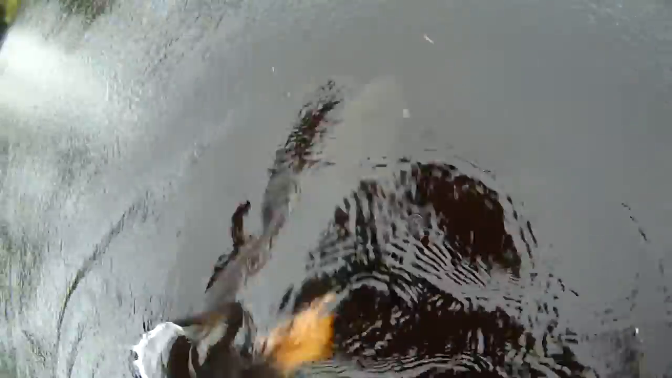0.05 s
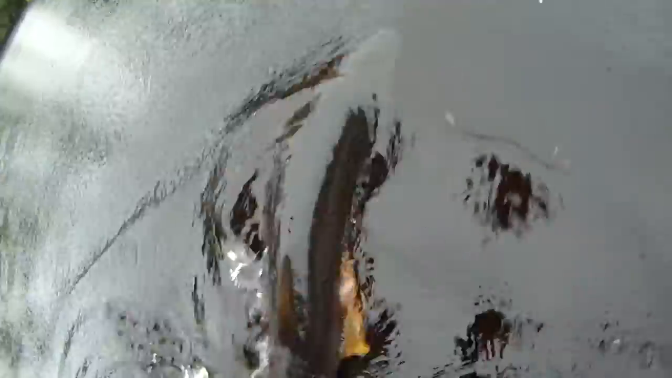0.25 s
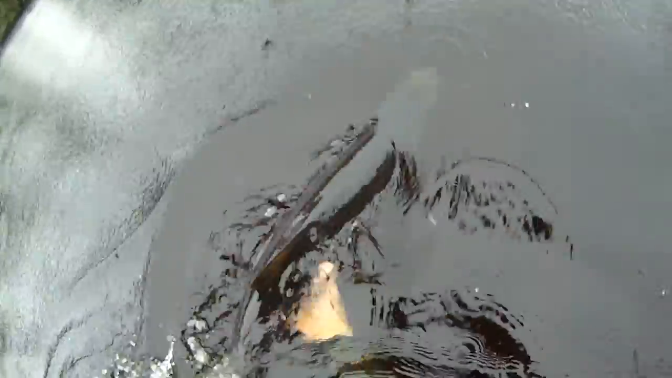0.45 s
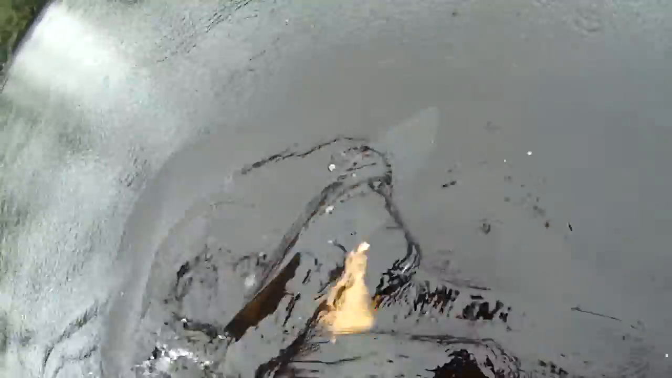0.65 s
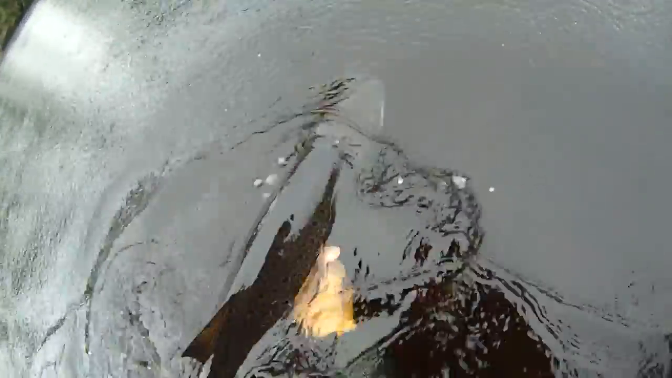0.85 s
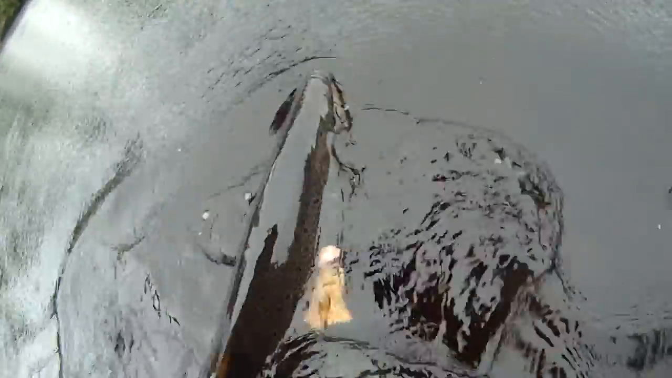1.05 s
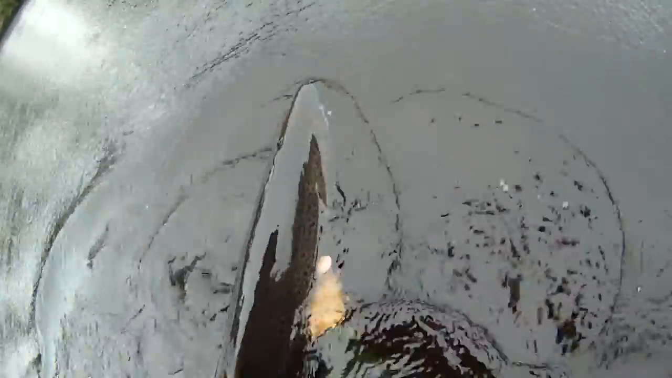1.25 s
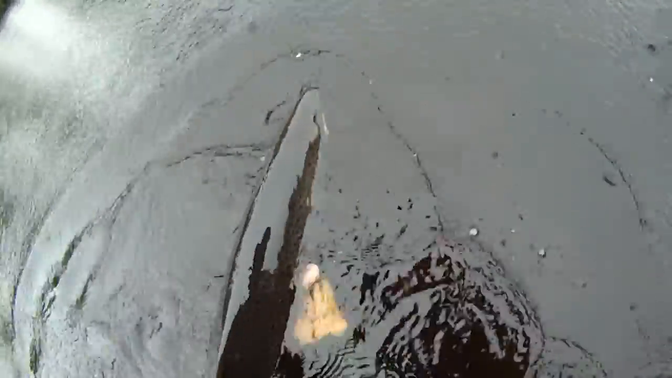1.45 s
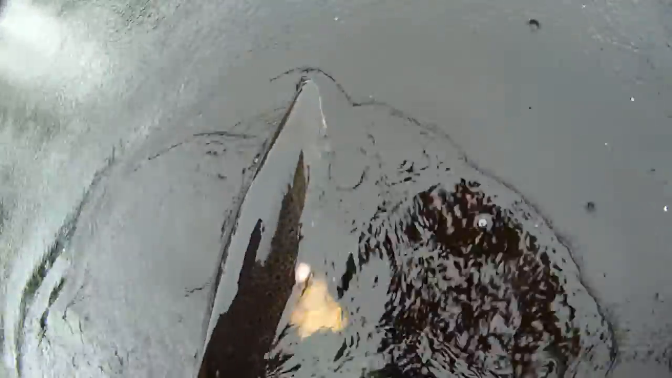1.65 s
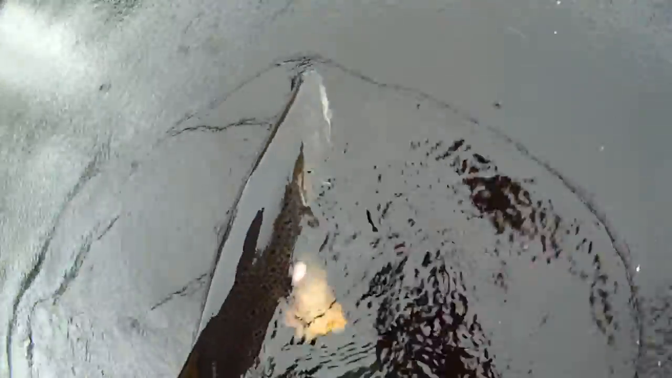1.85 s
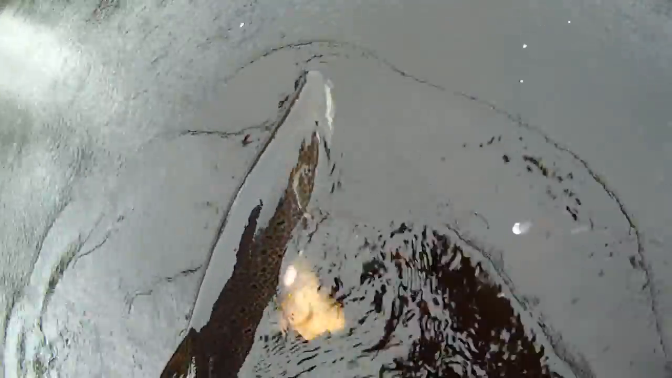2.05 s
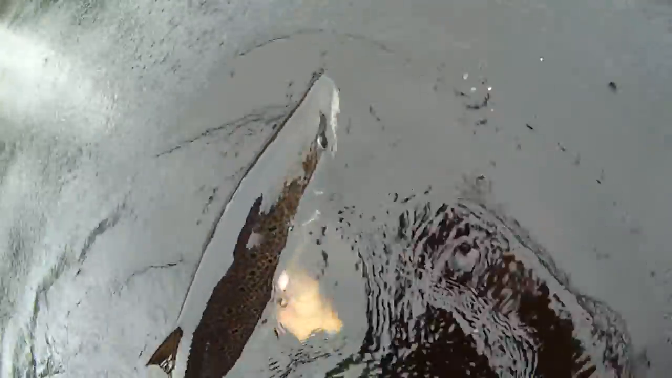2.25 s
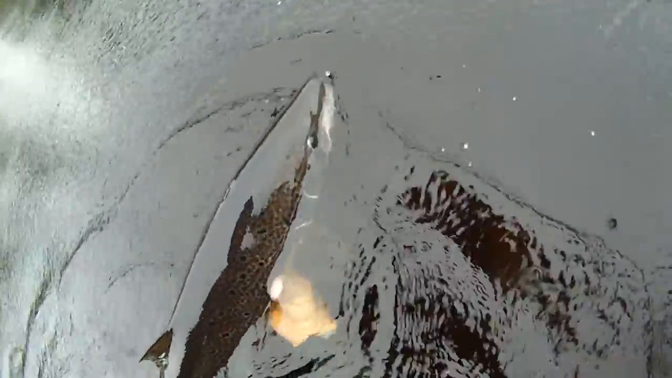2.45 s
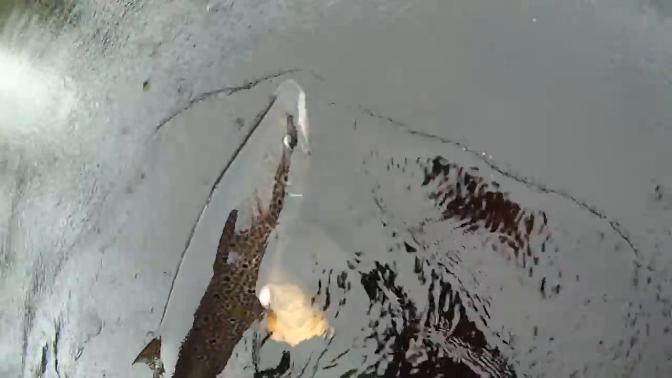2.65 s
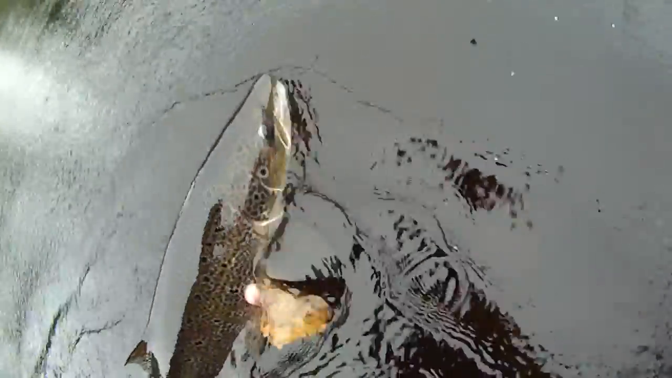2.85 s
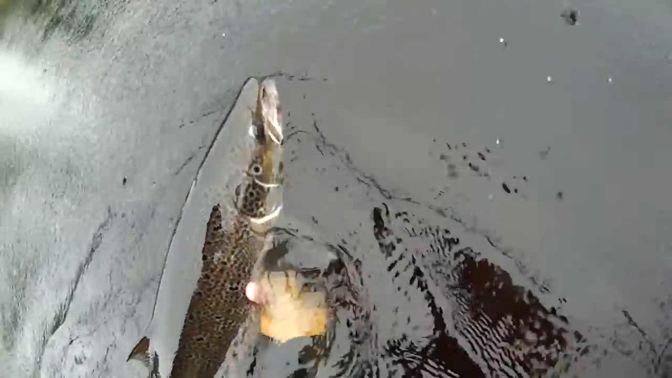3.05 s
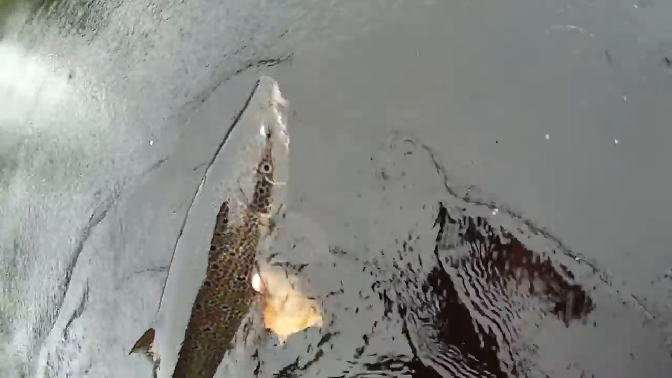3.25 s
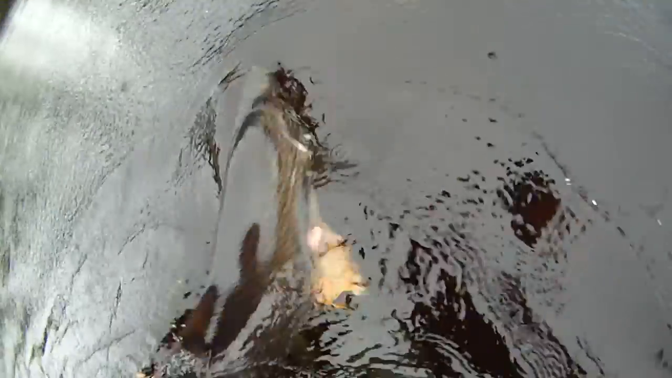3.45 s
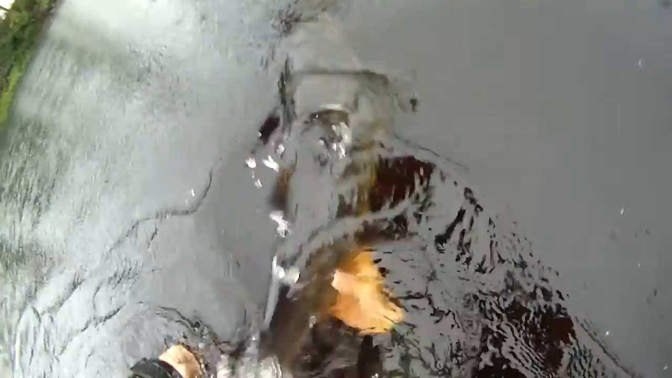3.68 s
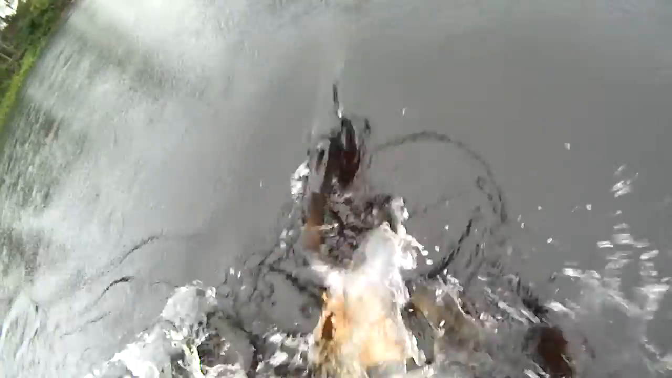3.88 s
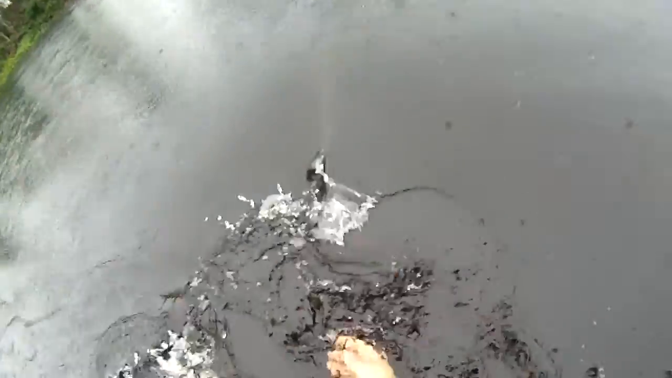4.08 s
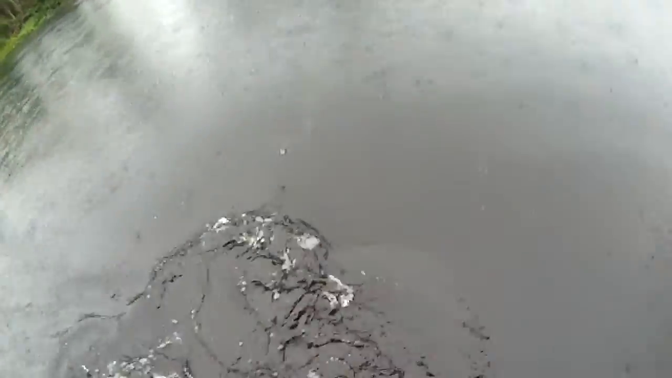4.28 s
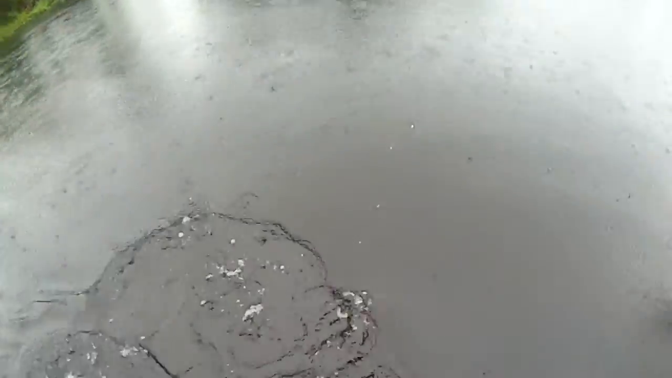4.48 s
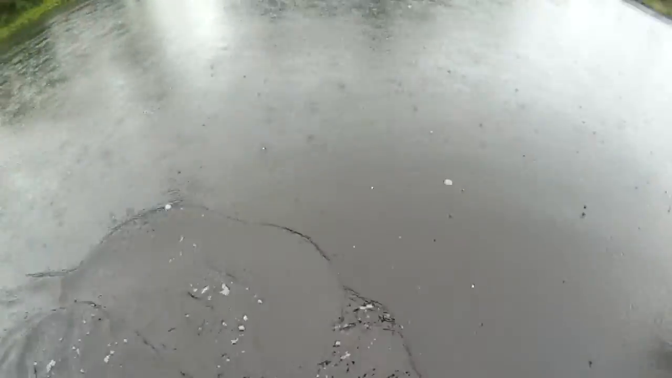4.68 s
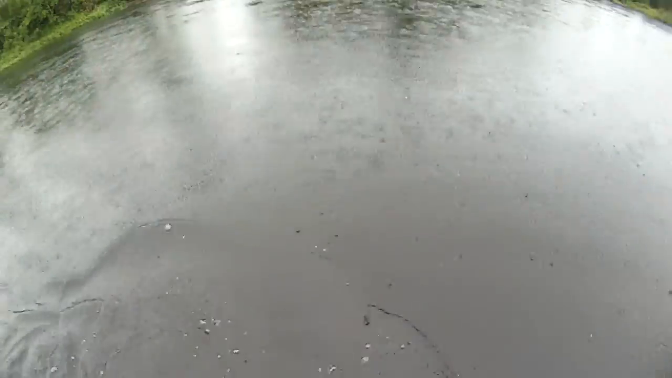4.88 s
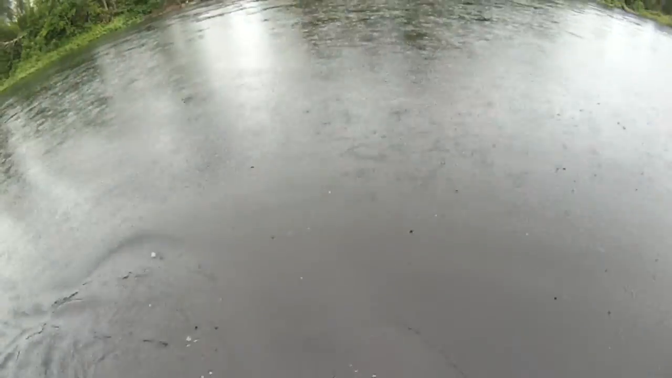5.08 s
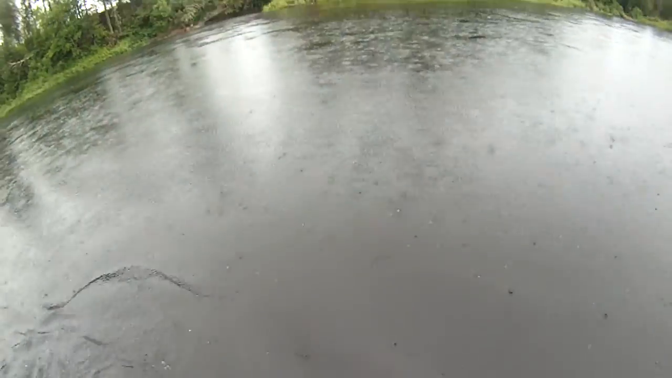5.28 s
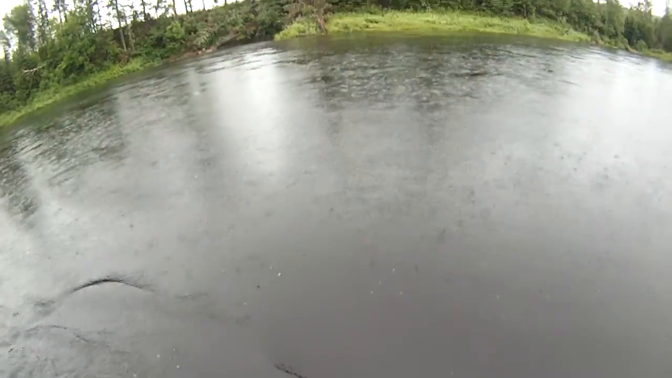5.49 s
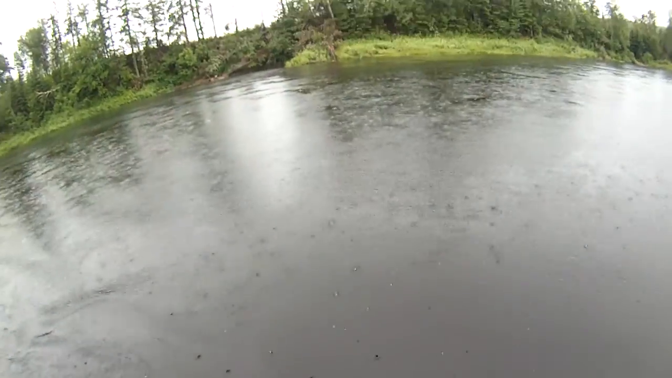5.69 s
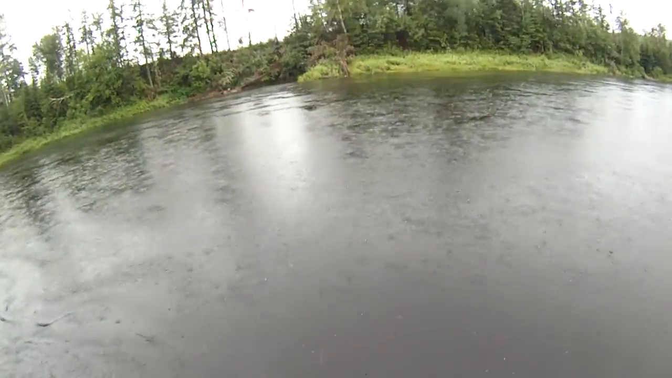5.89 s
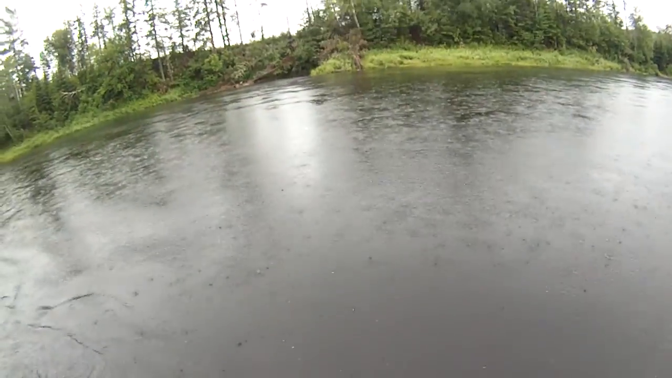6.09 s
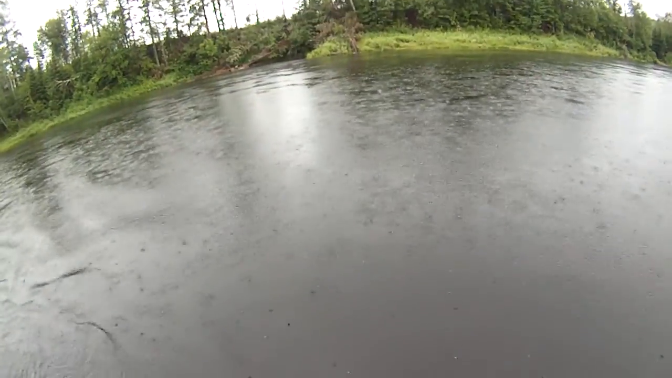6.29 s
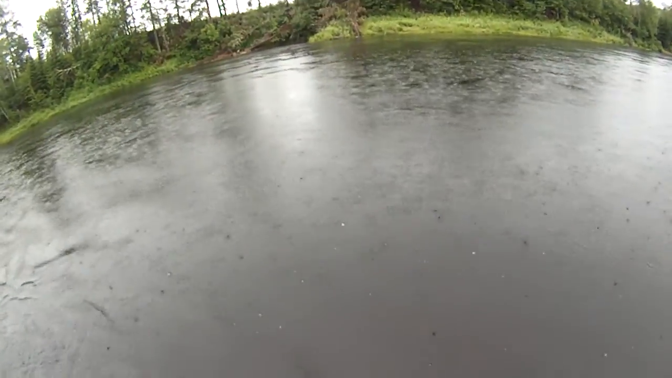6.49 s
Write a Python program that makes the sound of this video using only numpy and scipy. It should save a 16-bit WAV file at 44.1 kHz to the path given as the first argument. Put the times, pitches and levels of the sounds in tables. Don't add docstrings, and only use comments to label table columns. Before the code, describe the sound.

A boxed-in, dull recording perspective at the surface of a river in light rain. A heavy bubbly splash opens, dying within about a second. A quiet pause follows with soft patter and ticks on the shell. Then a sudden second splash hits with sharp slaps and crackling spray, followed by soft wading surges, low glugs, thin foam fizz and raindrops knocking the housing.

```python
import sys
import numpy as np
from scipy import signal
from scipy.fft import rfft, irfft, next_fast_len
from scipy.io import wavfile
from scipy.ndimage import uniform_filter1d, map_coordinates

SR = 44100
rng = np.random.default_rng(int(sys.argv[2]) if len(sys.argv) > 2 else 0)


def ratio_of_db(decibels):
    return 10 ** (np.asarray(decibels, float) / 20)


def to_wav(s):
    ch = np.atleast_2d(s).T
    pcm = np.round(np.clip(ch, -1, 1) * 32767)
    wavfile.write(sys.argv[1], SR, pcm.astype(np.int16))


N = 287973

# [f/Hz, level per Hz/dB]
HISS_COLOUR = [(24, -42), (40, -4), (194, -10), (256, -2), (503, -2), (715, 3), (1040, -16.5), (1240, -5),
               (1680, -11), (14500, -21.5), (16000, -16.5)]
# [f/Hz, level per Hz/dB]
SLOSH_COLOUR = [(71, -49), (120, -25), (156, -37), (209, -4.5), (460, -1), (610, 1.5), (1110, 0),
                (1420, -19.5), (1600, -40), (2080, -64), (3520, -120)]
# [f/Hz, level per Hz/dB]
PUSH_COLOUR = [(15, 5.5), (40, -4.0), (125, 0.5), (220, 0.5), (400, -12.0)]
# [f/Hz, level per Hz/dB]
FIZZ_COLOUR = [(1300, -0.5), (1700, 3.5), (2100, 0), (2350, -8), (2800, -1), (3500, -2.5), (4700, 0.5),
               (6600, -6), (11000, -8), (15000, -8.5)]
# [t/s, first notch f/Hz, strength of the image/0-1]
MIRROR = [
    (0, 4500, .36),
    (3.55, 4600, .26),
    (3.8, 4400, .26),
    (4.2, 4100, .34),
    (4.7, 4200, .55),
    (5.1, 4650, .62),
    (5.4, 5100, .65),
    (5.6, 5400, .6),
    (6.53, 4800, .35),
]
# [t/s, share of them left/0-1, smooth rush against bubbles/0-1]
LARGE_BUBBLES = [(0, 0, 0.5), (.1, 0.3, 0.17), (.45, 1, 0.34), (.49, 0.02, 0.28), (1.1, 0, 0.3),
                 (1.3, 0.17, 0.3), (3.6, 1, 0.22), (3.8, 1, 0.53), (4.08, 0.4, 0.32), (4.14, 0.42, 0.75),
                 (4.5, 0.5, 0.8), (6.53, 0.5, 0.52)]
# [crest t/s, slosh level/dB, hold/s, release/dB per s, foam against slosh level/dB]
SURGES = [(0.034, -49.5, .03, 60, -12), (0.138, -25, 0.04, 100, -20), (0.267, -32, 0.21, 63, -15.5),
          (0.453, -30, 0.2, 98, -13), (0.5, -37.5, 0.029, 90, -7.5), (0.831, -45, 0.025, 102, -11),
          (1.152, -49, 0.28, 43, -17), (1.626, -60.5, 0.092, 17, -12), (2.584, -64.5, 0.083, -1, -22),
          (3.097, -60.5, 0.089, 18, -25), (3.484, -55.5, .01, 60, -13), (3.56, -59, .03, 60, 1),
          (3.583, -42.5, 0.087, 37, -4), (3.679, -29, 0.45, 110, -11.5), (3.84, -40, 0.068, 41, -6.5),
          (4.07, -45.5, 0.1, 220, -5), (4.387, -49.5, 0.16, 40, -15), (4.588, -47.5, 0.16, 30, -12),
          (4.824, -49.5, 0.2, 25, -13.5), (5.074, -49.5, 0.17, 32, -12), (5.287, -53, 0.11, 24, -9.5),
          (5.434, -50, 0.12, 41, -12.5), (5.522, -51.5, 0.054, 63, -22), (5.644, -49.5, 0.23, 35, -20),
          (5.932, -55.5, 0.12, 37, -34), (6.17, -52.5, 0.044, 70, -16), (6.316, -64, 0.042, 62, 0),
          (6.497, -53.5, .04, 60, -20)]
# [t/s, low push level/dB]
SHOVES = [(.12, -51), (.3, -47), (.44, -46.5), (1.5, -59), (3.2, -59.5), (3.69, -46.5), (4.04, -59),
          (4.47, -52.5), (4.7, -50), (4.86, -44.5), (5.04, -49.5), (5.3, -48), (5.62, -50), (5.89, -53),
          (6.2, -55.5), (6.53, -52), (.75, -58), (5.2, -54)]
# [t/s, peak level/dB, f/Hz]
LUMPS = [(1.599, -48, 124), (1.637, -47, 128), (2.469, -43, 127), (1.465, -51, 128), (3.461, -41.5, 316),
         (3.468, -39.5, 132), (4.748, -43, 140), (4.952, -33, 162), (5.455, -43, 231), (4.415, -39, 131),
         (4.663, -38.5, 124), (4.824, -44, 216), (4.871, -34.5, 237), (4.997, -33, 270),
         (5.227, -33.5, 266), (5.576, -32.5, 246), (5.637, -28.5, 185), (5.804, -39, 192),
         (5.492, -38, 226), (5.842, -41, 96.9), (5.99, -35.5, 155), (6.037, -44.5, 158),
         (6.286, -34.5, 166)]
# [t/s, peak level/dB, ring f/Hz, tick level/dB]
SLAPS = [(0.124, -16.5, 980, -19), (.1295, -12, 680, -34), (.503, -17.5, 950, -40), (3.597, -23, 670, -28),
         (3.698, -14, 560, -24), (3.942, -19, 790, -30), (0.492, -17, 835, -34), (0.578, -24.5, 910, -28),
         (0.937, -31, 720, -54), (3.6335, -3, 680, -21.5), (3.7188, -8.5, 516, -32),
         (3.751, -13.5, 825, -25), (3.7598, -10.5, 650, -32), (3.83, -19, 700, -17),
         (3.947, -15.5, 830, -34), (4.284, -26, 730, -39)]
# [t/s, peak level/dB, ring f/Hz, tick level/dB]
RAINDROPS = [(1.185, -23.5, 980, -46), (1.216, -28, 960, -44), (1.23, -34.5, 620, -12),
             (1.371, -25, 910, -33), (1.821, -36, 790, -37), (2.339, -40.5, 810, -4.5),
             (2.37, -46, 690, -1.5), (2.465, -29.5, 760, -15), (2.6, -26.5, 1000, -17),
             (2.702, -37, 1010, -31), (3.002, -26.5, 990, -18), (3.049, -33, 750, -2),
             (3.119, -37, 635, -8), (3.185, -28.5, 1100, -18), (4.561, -29.5, 1150, -28),
             (4.664, -24.5, 970, -36), (4.698, -28.5, 1040, -32), (4.781, -25.5, 890, -26),
             (4.825, -24.5, 800, -11.5), (4.946, -18.5, 930, -22.5), (5.1924, -18.5, 636, -10),
             (5.2209, -24, 1010, -19), (5.318, -18, 870, -25), (5.495, -21.5, 855, -31),
             (5.745, -26.5, 1020, -23), (5.9435, -5.5, 893, -26), (6.16, -18.5, 914, -31),
             (6.286, -35, 1030, -24), (6.494, -36, 776, -14), (6.523, -20.5, 675, -12)]
# [t/s, peak level/dB, ring f/Hz]
DRIZZLE = [(1.311, -39, 503), (1.403, -37, 597), (1.575, -41, 700), (1.733, -46, 750), (1.878, -41, 950),
           (1.911, -41, 1140), (2.026, -40, 1010), (2.045, -41, 730), (2.095, -44, 740), (2.173, -43, 848),
           (2.189, -42, 1020), (2.565, -38.5, 750), (2.681, -42, 966), (3.074, -41, 775), (3.223, -39, 708),
           (5.364, -34, 496), (5.387, -34, 800)]
# [t/s, peak level/dB, f/Hz]
PLOPS = [(0.103, -16, 864), (.147, -18, 513), (0.161, -23.5, 205), (.167, -15.5, 650), (0.178, -20.5, 1073),
         (0.2039, -14, 910), (.083, -31, 840), (.11, -23.5, 490), (.218, -23, 516), (.265, -24.5, 404),
         (.305, -28, 460), (0.364, -23, 310), (0.491, -23, 506), (.512, -25.5, 480), (0.533, -31, 1300),
         (.58, -23.5, 1240), (.614, -30, 958), (.65, -29, 920), (.73, -33.5, 458), (.774, -30.5, 820),
         (3.581, -24.5, 1070), (3.676, -17, 500), (3.853, -23.5, 606), (3.86, -22, 402),
         (3.995, -26.5, 503), (4.028, -27.5, 388), (4.08, -35, 302), (4.154, -30, 930), (4.352, -39, 744),
         (4.431, -39, 760), (4.542, -38, 460), (4.591, -38, 950), (4.612, -39, 940), (4.705, -29.5, 1000),
         (5.069, -39, 840), (5.426, -39, 770), (6.172, -37.5, 1040), (6.17, -38, 448), (.349, -20.5, 425),
         (0.359, -20.5, 870), (.455, -17.5, 577), (0.586, -22, 371), (0.825, -26, 1045), (.838, -23.5, 840),
         (3.552, -27.5, 865), (3.577, -23.5, 386), (3.614, -24, 1570), (3.629, -13.5, 905),
         (3.657, -20, 980), (3.665, -18.5, 394), (3.739, -22, 1120), (3.9, -21, 440), (4.041, -24.5, 820),
         (4.575, -36, 430), (4.51, -40, 387), (4.574, -32, 1090), (6.198, -37.5, 830)]
# [t/s, peak level/dB, f/Hz, time to fall 60 dB/s, rise as a share of f/per s]
SINGERS = [(.011, -33, 586, 0.13, 24.5), (0.1265, -15.5, 1082, 0.04, 6), (.226, -24.5, 503, 0.053, -7.5),
           (.448, -16, 1035, 0.043, 12), (.636, -18.5, 395.5, 0.17, 18), (.729, -31, 747, 0.13, 2.5),
           (.731, -29.5, 940, 0.072, 8.5), (.948, -37.5, 647, 0.077, 10), (1.016, -37, 940, 0.058, 3),
           (1.087, -32.5, 1044, 0.036, -3), (3.512, -28, 994, 0.053, -2), (3.958, -23, 846, 0.065, 10),
           (4.25, -26.5, 994, 0.041, 3.5), (4.857, -32.5, 1123, 0.043, 4.5), (5.099, -47, 2640, 0.019, 19),
           (5.118, -33.5, 640, 0.076, -1), (5.157, -43, 3100, 0.01, 5), (5.172, -39, 880, 0.09, -4),
           (5.647, -44.5, 2850, 0.02, 22), (5.305, -36.5, 842, .084, 1.5), (5.359, -24.5, 1000, 0.044, 9.5),
           (5.456, -37.5, 2830, 0.011, -2), (5.705, -38, 722, 0.18, 1), (6.33, -44.5, 636, 0.088, -1),
           (6.31, -48, 326, .07, 23), (1.815, -47, 690, 0.078, 2), (3.634, -13.5, 589, 0.051, 0)]
# [t/s, peak level/dB, f/Hz]
TICKS = [(0.094, -25, 5930), (0.1245, -27.5, 6080), (0.2028, -24, 4930), (0.2404, -36, 6350),
         (0.2533, -32, 8050), (0.277, -31, 6130), (0.3183, -27.5, 6200), (0.392, -42, 6300),
         (0.4187, -25, 5900), (0.4578, -26, 6490), (0.4965, -23.5, 6540), (0.6223, -32, 7120),
         (0.678, -30, 5840), (0.688, -24.5, 6140), (0.9136, -36.5, 6200), (0.95, -39.5, 6690),
         (3.203, -46, 6000), (3.542, -25, 5370), (3.6086, -29, 6560), (3.6297, -22.5, 6080),
         (3.6598, -23, 6150), (3.92, -28, 6730), (3.9873, -33, 6550), (4.0272, -38, 6660),
         (4.1106, -36, 5600), (4.1444, -44, 6660), (4.427, -43, 5330), (4.487, -48, 6620),
         (4.6028, -34, 5100), (4.6197, -32, 6480), (4.6478, -41, 5100), (4.6828, -49, 5940),
         (4.751, -49, 5970), (4.8833, -36.5, 4570), (4.9252, -50, 5750), (4.939, -42, 6350),
         (5.038, -45, 6060), (5.097, -50, 7730), (5.1093, -41, 6590), (5.2685, -36.5, 6100),
         (5.3607, -35, 5450), (5.39, -34, 5800), (5.433, -34.5, 4900), (5.454, -41, 7100),
         (5.546, -35.5, 5800), (5.6477, -39, 5350), (5.3101, -44, 6860), (5.1505, -48, 7450),
         (5.2178, -43, 5200), (6.262, -36, 6270)]
# [t/s, peak level/dB, f/Hz]
SPARKS = [(.0343, -36, 5460), (.7617, -35, 7730), (.785, -21.5, 12300), (.824, -37, 12500),
          (.8789, -43, 5360), (1.048, -30, 12900), (1.1842, -36, 12100), (1.218, -38, 7250),
          (1.294, -34, 10300), (2.118, -34, 12900), (2.9896, -37, 9190), (3.0148, -24.5, 9900),
          (3.5116, -11.5, 4960), (3.5134, -10.5, 12100), (3.7022, -9, 9700), (3.7308, -5.5, 9500),
          (4.065, -15.5, 12300), (4.2574, -31, 5900), (5.505, -32, 12800), (5.565, -34, 12500),
          (4.8289, -36, 10000), (4.96, -27, 10200), (4.999, -29, 10900), (5.156, -30, 13800),
          (5.3497, -30, 11370), (5.4829, -30, 8170), (5.4953, -26, 8500), (5.6221, -36, 7100),
          (6.1986, -30, 6460), (6.312, -31, 7350), (6.3345, -32, 11500), (6.3592, -29, 8400)]
# [t/s, peak level/dB, f/Hz]
MIST = [(0.1012, -29, 12500), (0.1663, -31, 11600), (0.1834, -25, 12200), (0.3805, -43, 10100),
        (0.4429, -35, 9160), (0.4574, -31, 12200), (0.4744, -29, 9800), (0.4988, -26, 10000),
        (0.5214, -34, 10100), (0.5402, -23, 10100), (0.5574, -30, 12400), (0.5714, -35, 11800),
        (0.5854, -37, 12200), (0.6205, -38, 12600), (0.6784, -31, 11100), (0.7224, -34, 11700),
        (1.0774, -42, 12900), (3.4815, -44, 9920), (3.5473, -20, 12700), (3.5544, -33, 14400),
        (3.5673, -23, 13400), (3.5912, -29, 12100), (3.6167, -46, 9700), (3.6321, -26, 10000),
        (3.679, -21, 10700), (3.7134, -22, 9720), (3.7886, -21, 11000), (3.9784, -35, 11100),
        (4.2248, -40, 10600), (4.3046, -41, 12000), (4.5291, -40, 9860), (4.6478, -38, 11500),
        (4.79, -41, 9640), (4.8165, -45, 11600), (4.8958, -54, 11000), (5.0632, -46, 11200),
        (5.2682, -42, 13700), (5.4952, -40, 12300), (5.1086, -41, 13300), (5.3004, -48, 13400),
        (5.4415, -35, 9500), (5.4834, -36, 14100), (5.5353, -42, 11500)]
# [t/s, peak level/dB, f/Hz]
BEADS = [(0.0608, -37, 2100), (0.1013, -39, 1760), (0.167, -32, 1940), (0.2, -34, 1840), (0.395, -35, 1800),
         (0.444, -27, 3180), (0.5336, -32, 2730), (0.7637, -42, 2050), (1.8517, -45, 1670),
         (3.4703, -43, 1830), (3.4844, -47, 2950), (3.4977, -35, 1890), (3.51, -29.5, 3070),
         (3.5533, -41, 1920), (3.613, -32, 2900), (3.8157, -39, 1920), (4.0228, -45, 1760),
         (4.0642, -36, 2010), (4.168, -37, 3150), (4.8046, -41, 1700), (5.2794, -41, 3420),
         (5.3882, -45, 2250), (6.1754, -44, 1830), (6.2008, -44, 1850), (6.314, -47, 3040)]


def evened(x):
    return x / np.sqrt(np.mean(x ** 2) + 1e-20)


def add(mix, s, sound):
    start = max(round(s * SR), 0)
    part = mix[start:][:len(sound)]
    part += sound[:len(part)]


def filtered(x, order, hz, kind="low"):
    return signal.sosfilt(signal.butter(order, hz, kind, fs=SR, output="sos"), x)


def shaped(x, points):
    size = next_fast_len(N)
    hz, db = np.transpose(points)
    bins_hz = np.arange(size // 2 + 1) * SR / size
    gain = ratio_of_db(np.interp(np.log(bins_hz + 1), np.log(hz), db))
    return irfft(rfft(x, size) * gain, size)[:N]


def ring(hz, t60, rise=0., soft=0.54, linger=1):
    t = np.arange(int(t60 * SR) + 8) / SR
    slide = 1 + rise * .15 * (1 - np.exp(-t / .15))
    wave = np.sin(2 * np.pi * np.cumsum(hz * np.maximum(slide, .3)) / SR)
    wave = wave * ratio_of_db(-60 * (t / t60) ** linger) * (1 - np.exp(-t * hz / soft))
    return wave / abs(wave).max()


def random_hits(per_s, spread_db):
    size = ratio_of_db(spread_db * np.minimum(rng.exponential(1, N), 4))
    return size * (rng.random(N) < per_s / SR)


def swarm(lo_hz, hi_hz, per_s, cycles, spread_db, climb, count):
    hits = random_hits(per_s, spread_db)
    kind = rng.integers(0, count, N)
    shape = rng.uniform(0.54, 2.6, (count, 2))
    out = np.zeros(N)
    for k, hz in enumerate(np.geomspace(lo_hz, hi_hz, count)):
        t60 = cycles * shape[k, 0] / hz
        bubble = ring(hz, t60, climb * shape[k, 1] / t60)
        out += hz * signal.oaconvolve(hits * (kind == k), bubble)[:N]
    return out


def bursts(per_s, spread_db, decay_s):
    hits = random_hits(per_s, spread_db)
    return evened(1 + signal.lfilter([1], [1, -np.exp(-1 / (decay_s * SR))], hits))


def housing(x):
    return filtered(filtered(x, 7, 1413), 3, 150, "high")


def river():
    return ratio_of_db(-60.5) * evened(shaped(rng.standard_normal(N), HISS_COLOUR))


def taps():
    drizzle_tick_db = -29
    blows = SLAPS + RAINDROPS + [(*row, drizzle_tick_db) for row in DRIZZLE]
    dull, bright = np.zeros(N), np.zeros(N)
    chance = rng.uniform(0.746, 1.283, (len(blows), 4))
    for (s, db, hz, tick_db), c in zip(blows, chance):
        thud_db = -11 + 0.2 * tick_db - 17 * (hz - 800) / 1000 - 7 * (db > -12)
        add(dull, s, ratio_of_db(db + 2.0) * ring(hz, 0.006, soft=0.25))
        add(dull, s + 0.00297 * c[0], ratio_of_db(db - 12.0) * ring(hz * c[1], 0.013))
        add(dull, s + 0.00087, -ratio_of_db(db + thud_db) * ring(350 * c[2], 0.047, rise=-29, soft=0.64))
        add(bright, s, ratio_of_db(db + tick_db) * ring(2400 * c[3], 0.0023))
        add(bright, s, ratio_of_db(db + tick_db - 9) * ring(4600 * c[1], 0.004))
    patter = ratio_of_db(-68) * evened(swarm(616, 1250, 140, 5.5, 2.4, 0, count=8))
    return housing(dull + patter) + bright


def singles():
    plop_cycles, plop_rise = 17.2, 7.3
    plops = [(s, db, hz, plop_cycles / hz, plop_rise) for s, db, hz in PLOPS]
    dull, out = np.zeros(N), np.zeros(N)
    for s, db, hz, t60, rise in SINGERS + plops:
        bubble = ring(hz, t60 * 0.92, rise, soft=0.8, linger=1.4)
        add(dull if hz < 2000 else out, s, ratio_of_db(db) * bubble)
    for s, db, hz in LUMPS:
        add(out, s, ratio_of_db(db) * ring(hz, 0.032, rise=-3.0, soft=0.59))
    return housing(dull) + out


def summed(levels_db, calm_db):
    power = (ratio_of_db(levels_db) ** 2).sum(0) + ratio_of_db(calm_db) ** 2
    return np.interp(np.arange(N), np.arange(len(power)) * 64, np.sqrt(power))


def water():
    rise, sag, shove_slope = 258, 18, 71.5
    t = np.arange(0, N + 64, 64) / SR
    crest, db, hold, release, foam_db = np.transpose(SURGES)[:, :, None]
    age = t - crest
    level = db + rise * np.minimum(age, 0) - sag * np.clip(age, 0, hold)
    level = level - abs(release) * np.maximum(age - hold, 0)
    foam = level + foam_db
    early = 5.5 * np.exp(-np.maximum(age, 0) / 0.0042)
    s, push_db = np.transpose(SHOVES)[:, :, None]
    heave = summed(level, -65)
    shove = summed(push_db - shove_slope * abs(t - s), -69)
    froth = summed(foam, -77.5)
    flung = summed(foam - 5 + early, -79.5)
    return heave, shove, froth, flung


def ticks():
    out, t = np.zeros(N), np.arange(400) / SR
    tiny = [(s, db + 12, hz) for s, db, hz in TICKS]
    mist = [(s, db + 7, hz) for s, db, hz in MIST]
    drops = SPARKS + tiny + mist
    fade = ratio_of_db(-60 * t / 0.018) * (1 - np.exp(-t / 0.00064))
    for (s, db, hz), noise in zip(drops, rng.standard_normal((len(drops), 400))):
        crack = filtered(noise, 2, [hz * 0.67, min(hz * 1.44, 20000)], "band")
        add(out, s, ratio_of_db(db - 17.5) * ring(hz, 0.0074, soft=0.26))
        add(out, s, ratio_of_db(db - 13.5) * crack * fade)
    for s, db, hz in BEADS:
        add(out, s, ratio_of_db(db - 7.0) * ring(hz, 0.016, rise=13.0, soft=0.42))
    return out


def fizz(froth, flung):
    drift = uniform_filter1d(uniform_filter1d(rng.standard_normal(N), 300), 300)
    clumps = ratio_of_db(2.0 * evened(drift))
    spray = evened(swarm(1491, 4280, 700, 31, 3.1, 0.097, count=16)) + 2.0 * rng.standard_normal(N)
    foam = evened(swarm(4793, 13570, 2500, 49, 2.8, 0.082, count=24)) + 0.85 * rng.standard_normal(N)
    sparse = np.clip(1 - froth / ratio_of_db(-38.5), .45, 1)
    jumps = bursts(130, 3.7, .0011) ** (1.25 * sparse)
    spray = shaped(filtered(spray, 4, 4500), [(900, -63)] + FIZZ_COLOUR)
    foam = shaped(filtered(foam, 4, 4500, "high"), FIZZ_COLOUR)
    both = flung * evened(clumps * jumps * spray) + froth * evened(jumps * foam) + ticks()
    n = np.arange(N)
    s, notch_hz, image = np.transpose(MIRROR)
    late = map_coordinates(both, [n - SR / np.interp(n / SR, s, notch_hz)], order=3)
    return both - np.interp(n / SR, s, image) * late


def slosh(heave, shove):
    bubbles = evened(shaped(swarm(148.8, 1572, 900, 14.7, 3.45, 0.21, count=30), SLOSH_COLOUR))
    rush = evened(shaped(rng.standard_normal(N), SLOSH_COLOUR))
    t = np.arange(N) / SR
    s, large, smooth = np.transpose(LARGE_BUBBLES)
    large = np.clip(np.interp(t, s, large), 0, 1)
    smooth = np.clip(np.interp(t, s, smooth), 0, 1)
    surge = np.sqrt(1 - smooth) * bubbles + np.sqrt(smooth) * rush
    deep = signal.sosfiltfilt(signal.butter(3, 360, fs=SR, output="sos"), surge)
    surge = surge - deep * (1 - large)
    push = evened(swarm(78, 281, 300, 4.3, 3.2, 0.084, count=10))
    push = evened(shaped(push + .5 * rng.standard_normal(N), PUSH_COLOUR))
    return heave * ratio_of_db(2.0) * surge + shove * push


def scene():
    heave, shove, froth, flung = water()
    background = river() + taps() + singles()
    thrashing = fizz(froth, flung) + slosh(heave, shove)
    return (background + thrashing)[None]


def band_limit(x):
    return signal.sosfilt(signal.butter(12, 16610, fs=SR, output="sos"), x)


def record(dry):
    edge = signal.firwin(601, 15290, window=("kaiser", 8), fs=SR)
    return band_limit(signal.oaconvolve(dry, edge[None], "same"))


dry = scene()
out = record(dry)
to_wav(out)
```